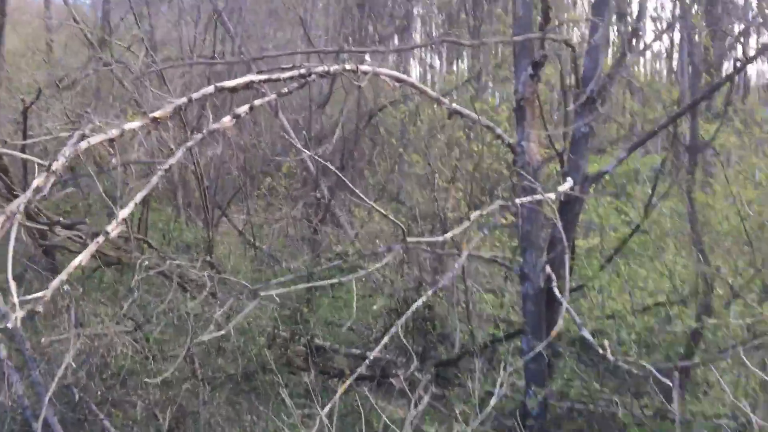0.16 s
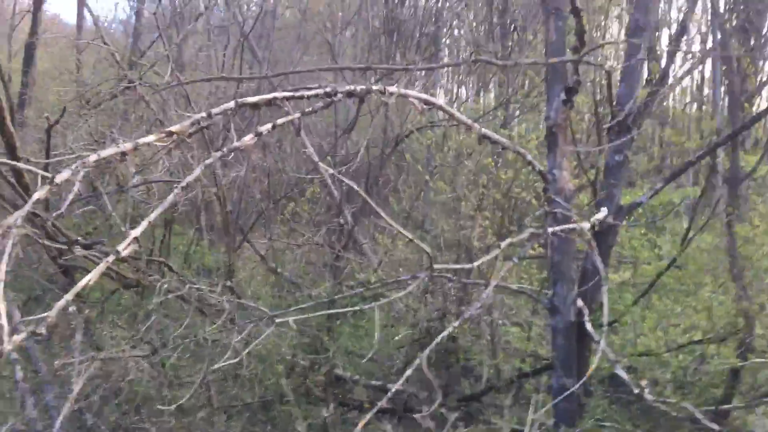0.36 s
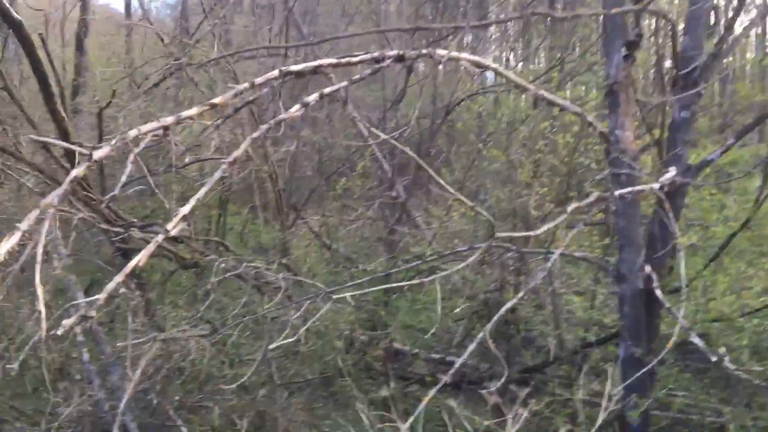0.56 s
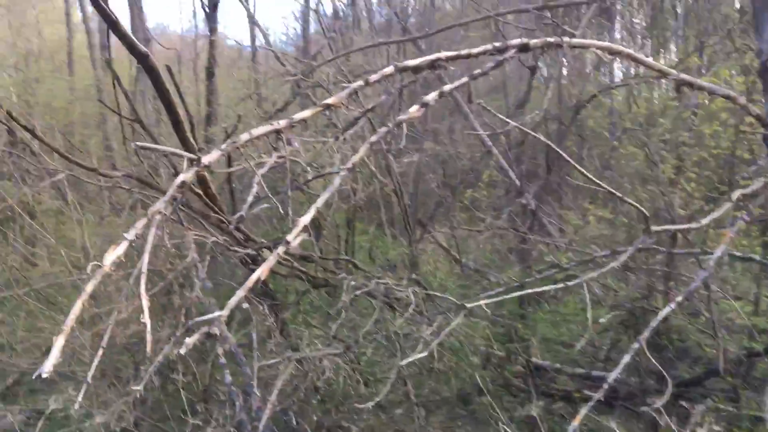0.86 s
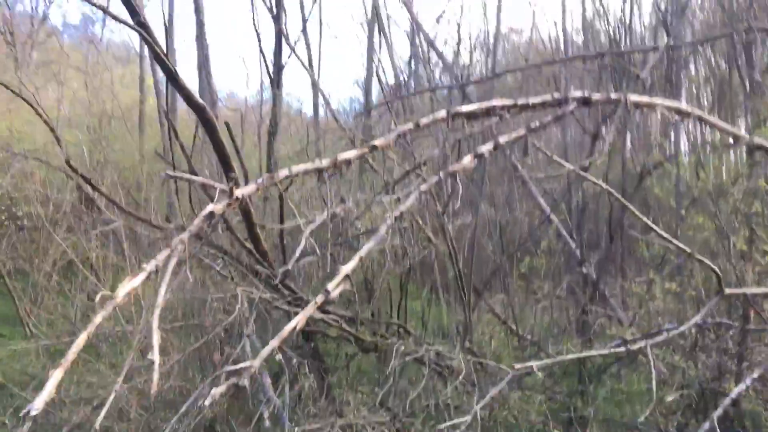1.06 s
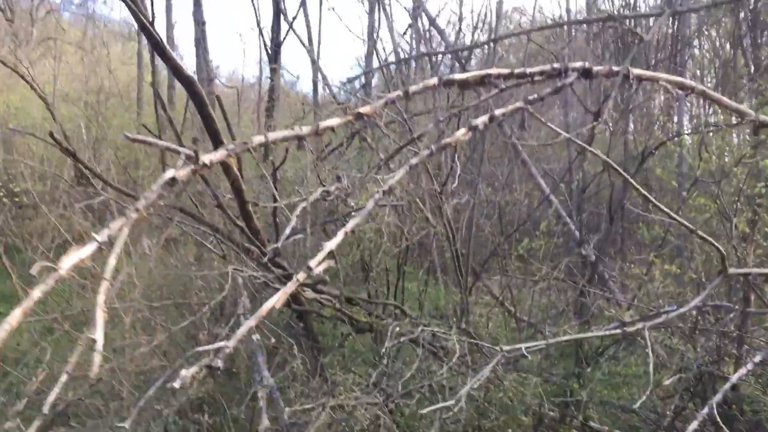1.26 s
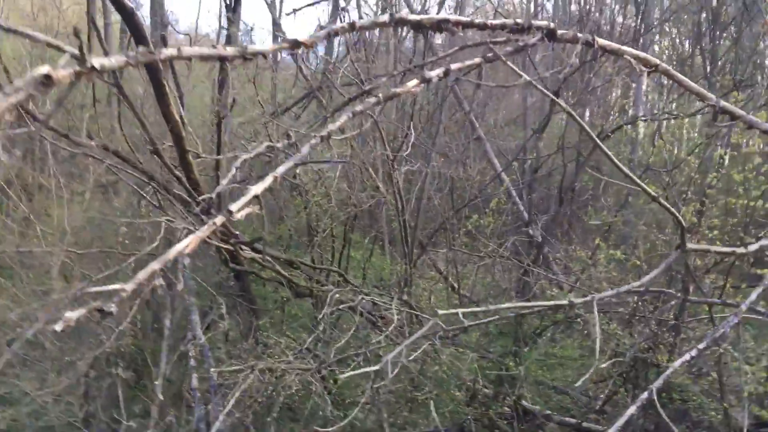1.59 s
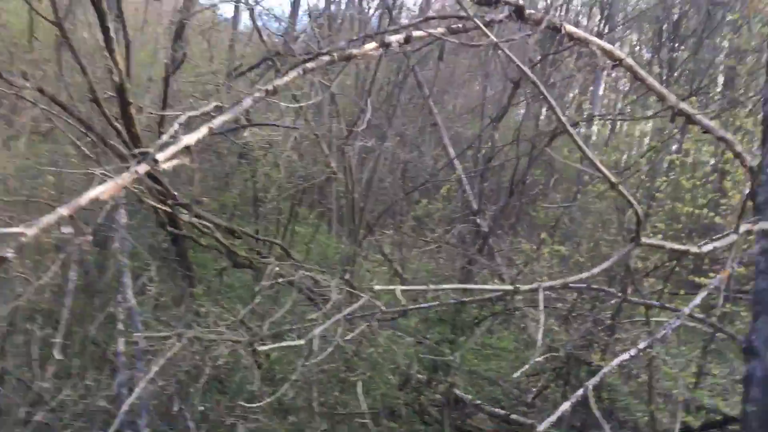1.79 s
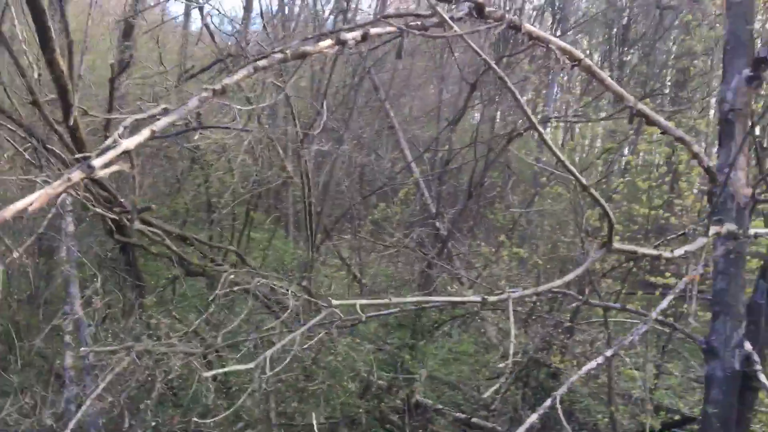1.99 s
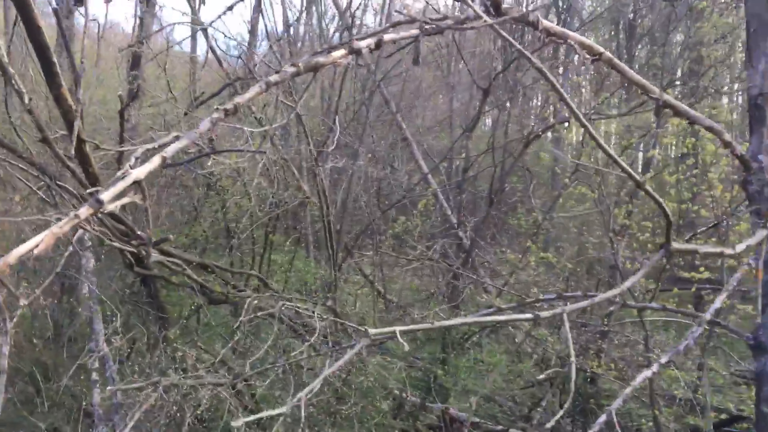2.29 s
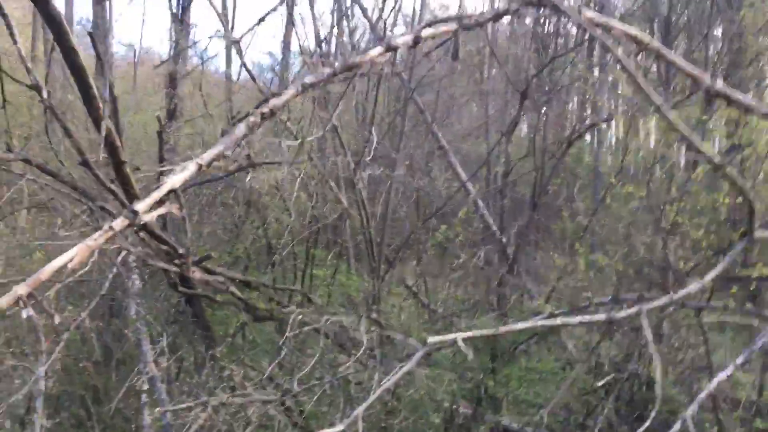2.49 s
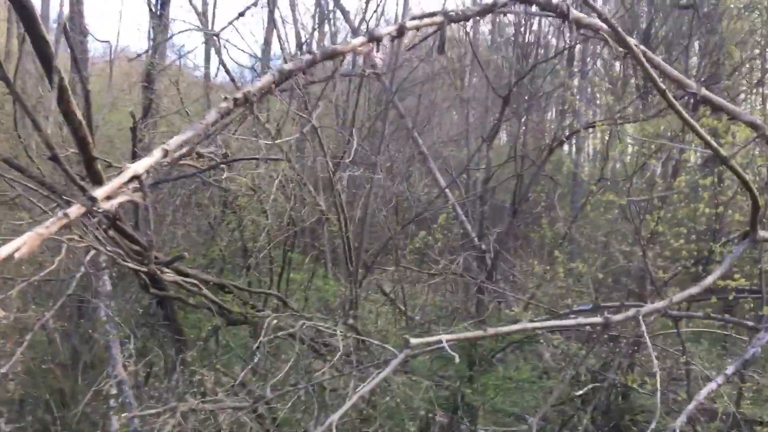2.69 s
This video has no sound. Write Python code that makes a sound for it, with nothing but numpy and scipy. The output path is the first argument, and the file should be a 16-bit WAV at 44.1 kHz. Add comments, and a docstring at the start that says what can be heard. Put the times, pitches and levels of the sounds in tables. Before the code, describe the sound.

Footsteps brush dry leaves and snap twigs close by, with the sharpest cracks midway and a lighter crackle near the end; low wind buffets the bare microphone while a songbird warbles thinly among the trees.

```python
"""Feet brush through dry leaves and snap small twigs close by in a wood: tiny cracks, hiss and short noise bursts.
A songbird warbles among the trees in gliding, wavering whistles, with scattered echoes from the trunks.
Gusty wind on the bare microphone rumbles as shaped noise and thumps it with single pressure swings.
Faint steady air noise lies under it all."""
import sys
import numpy as np
from scipy import signal
from scipy.fft import rfft, irfft
from scipy.io import wavfile
from scipy.ndimage import uniform_filter1d

SR = 44100
rng = np.random.default_rng(int(sys.argv[2]) if len(sys.argv) > 2 else 0)


def transcribe(signal):
    """Save signal, clipped to [-1, 1], as a 16-bit WAV file at the path in sys.argv[1]."""
    frames = np.atleast_2d(signal).T
    limited = np.clip(frames, -1, 1)
    pcm = np.round(limited * 32767).astype(np.int16)
    wavfile.write(sys.argv[1], SR, pcm)


N = 125685
t = np.arange(N) / SR  # [s]

# All spectra: (frequency [Hz], relative density [dB per Hz])
# Faint air of the place
AIR_SPECTRUM = [(290, -31), (500, -3.5), (2340, -12), (2670, -17), (3280, -14.5), (4960, -22.5),
                (9190, -22.5), (10500, -38.5), (12200, -23), (15400, -48), (16800, -45)]
AIR_DB = -68.5

# Bird among the trees: (start [s], length [s], level at note end before waver [dB], rise over the note [dB],
# then pitch at five even steps, before smoothing and wobble [Hz] x 5)
BIRD_NOTES = [(.0, 0.046, -68.5, -5, 4330, 4550, 4370, 4520, 4330),
              (.052, 0.048, -62, -2, 4350, 3910, 3310, 2910, 2850),
              (0.098, 0.03, -56, -1, 3380, 3380, 3360, 3400, 3320),
              (.133, 0.031, -64, 2, 3295, 3360, 3360, 3360, 3320),
              (.145, 0.058, -62, -3.5, 2630, 2710, 2616, 2750, 2800),
              (0.249, 0.16, -68, -1, 2506, 2560, 2664, 2577, 2460),
              (.295, 0.033, -57, 6, 2160, 2193, 2160, 2240, 2230),
              (.385, 0.15, -72.5, -8, 2200, 2233, 2186, 2030, 2085),
              (0.635, 0.049, -61.5, 2, 3800, 3700, 2970, 2990, 2950),
              (.72, 0.041, -58, 1, 3640, 3490, 3400, 2900, 2920),
              (.788, 0.023, -54.5, 2, 4040, 3870, 3600, 3400, 3500),
              (0.805, 0.088, -57.5, 2, 4100, 3790, 3680, 3860, 3970),
              (.934, 0.028, -66, -1.5, 5650, 5520, 5180, 5000, 4740),
              (1.028, 0.044, -47.5, 12, 4330, 3960, 3945, 3837, 3820),
              (1.128, 0.067, -62.5, -4, 4050, 5050, 5170, 5000, 4430),
              (1.184, 0.03, -72, 4, 3330, 3360, 3350, 3370, 3350),
              (1.268, 0.097, -56, -4.5, 3346, 3605, 3070, 3000, 2980),
              (1.367, 0.023, -56, -2, 3040, 2850, 2780, 2640, 2480),
              (1.52, 0.11, -58, -0.5, 4500, 3925, 3637, 3180, 3100),
              (1.668, 0.048, -60, -7.5, 3430, 3333, 3304, 3330, 3240),
              (1.75, 0.038, -62, 3, 4230, 4210, 4100, 4000, 4070),
              (1.916, 0.085, -56, 9, 1886, 2432, 2460, 2442, 2543),
              (2.02, 0.039, -68, 4, 2480, 2410, 2480, 2400, 2360),
              (2.068, 0.041, -58, 7, 2980, 3000, 2996, 2880, 2760),
              (2.201, 0.088, -52, 11.5, 2922, 3026, 3050, 3176, 3140),
              (2.295, 0.07, -69.5, -10.5, 3117, 3150, 3080, 3020, 3150)]
NOTE_EDGE_S = 0.0074
FAR_UNTIL_S, FAR_DIRECT_DB = 0.6, -5  # the first phrase sings from farther off, its direct sound lowered
WAVER_DB, FAR_WAVER_DB, WAVER_S = 3, 7, 0.01  # level waver: depth near and far, time span
WOBBLE, FAR_WOBBLE, WOBBLE_S = 0.003, 0.02, 0.012  # pitch wobble: rms fraction near and far, time span
WOOD_DB, WOOD_DELAY_S, WOOD_T60_S = -4, 0.011, 0.85
NEAR_TRUNKS_DB, NEAR_T60_S = 0, 0.25  # a second, faster decay

# Wind on the microphone, before lumps, brightening and flutter:
# (time [s], rumble level [dB], upper buffeting level [dB])
WIND_LEVELS = [(0.0, -40.5, -46.5), (0.071, -40.5, -65), (0.131, -22.5, -62), (0.212, -39, -53),
               (0.282, -23.5, -59), (0.32, -41.5, -57), (0.379, -25.5, -57), (0.441, -36, -46.5),
               (0.46, -32, -68), (0.55, -45, -61), (0.6, -36.5, -49.5), (0.81, -36, -80),
               (0.83, -27.5, -76), (0.938, -31.5, -54.5), (0.96, -48, -61), (1.019, -30.5, -72),
               (1.151, -33.5, -56.5), (1.191, -24.5, -52.5), (1.26, -31.5, -48), (1.309, -33, -64),
               (1.371, -38.5, -58.5), (1.431, -64, -60), (1.522, -27, -66), (1.592, -41.5, -65),
               (1.61, -24.5, -69), (1.67, -35, -50), (1.72, -24, -37), (1.941, -34, -53.5),
               (2.079, -21.5, -43.5), (2.098, -31, -40.5), (2.27, -37.5, -79), (2.28, -38, -60),
               (2.488, -26.5, -47), (2.56, -35, -66), (2.591, -30, -74), (2.712, -48.5, -64),
               (2.741, -32, -81), (2.85, -60, -57.5)]
# Low rumble, and the buffeting band that the eddies' grit shares
RUMBLE_SPECTRUM = [(12, -57), (24, -18), (54, 8), (107, 4), (268, -16), (353, -28.5), (400, -22),
                   (520, -60.5), (880, -120)]
BUFFET_SPECTRUM = [(88, -38), (150, 4), (533, -12), (669, -19.5), (968, -28.5), (1110, -26.5), (1310, -37),
                   (2000, -62), (2600, -49.5), (4400, -120)]
LUMP_DB, LUMP_S, FLUTTER_DB, FLUTTER_S = 4.5, 0.02, 6, 0.008
# Above the split the rumble gains BRIGHTEN dB more per dB of gust over MID_GUST_DB
SPLIT_HZ, BRIGHTEN, MID_GUST_DB = 140, 0.43, -28.5

# Eddies thumping the microphone: (time [s], peak of the swing's envelope [dB],
# swing length, at least 2 in use [ms], grit relative to the swing's level [dB])
EDDY_THUMPS = [(0.101, -33, 8.1, -17), (0.118, -27.5, 5.8, -0.5), (0.146, -22.5, 5.5, -13),
               (0.282, -30, 2.5, -6.5), (0.363, -17.5, 4.24, -11), (0.417, -33, 7.4, -16),
               (0.494, -29.5, 5.1, -15), (0.584, -38.5, 6.3, -8), (0.612, -28, 4.1, 3),
               (0.801, -33, 4.4, -13), (0.829, -18, 6.7, -25.5), (0.861, -27, 5.8, -7),
               (0.994, -28, 5.6, -13), (1.043, -39, 5.8, -10), (1.102, -30, 5, -8), (1.145, -45.5, 15, 4),
               (1.22, -38, 2.6, -20), (1.505, -26.5, 5.2, -15), (1.553, -36, 4.3, 1),
               (1.619, -17, 5.4, -8.5), (1.689, -18, 8.1, -10), (1.71, -17.5, 5.9, 0.5),
               (1.732, -18, 2, -2.5), (1.761, -18.5, 5.6, -1.5), (1.767, -29, 1.4, 1.5),
               (1.798, -20.5, 6, -6.5), (1.825, -26.5, 4.1, -6), (1.894, -19.5, 5.3, -10.5),
               (1.919, -26.5, 3.4, -12), (1.981, -29, 6.9, -14), (2.025, -33, 2.6, -7),
               (2.067, -14, 4.3, -7), (2.1, -26.5, 2.4, 0.5), (2.285, -18.5, 7.2, -35),
               (2.307, -24.5, 5.2, -6), (2.32, -22, 4.8, -11), (2.337, -21.5, 3.35, 0),
               (2.345, -21, 3.3, -10.5), (2.36, -18, 8.7, -6), (2.368, -13, 1.72, -11.5),
               (2.379, -30, 1.7, -25), (2.401, -17, 5, -0.5), (2.41, -29.5, 9.2, 9), (2.426, -26, 8.6, -12),
               (2.457, -19, 4.8, -18), (2.473, -12.5, 6, -17), (2.508, -28, 5.4, -2),
               (2.576, -38.5, 3.3, 1.5), (2.607, -32, 4.3, -8), (2.616, -23.5, 3.6, -8)]
EDDY_CYCLES, EDDY_SAG = 1.142, 0.39  # starting cycles per swing length, and how the swing slows
GRIT_S = 0.0028
GRIT_HZ, GRIT_BRIGHTEN = 614, 0.48  # top of the grit at mid gust, and dB that it moves per dB of strength

# Leaves under the feet: (time [s], rustle level [dB], dull scrape level [dB])
LEAF_LEVELS = [(.0, -65.5, -62), (.07, -65.5, -66.5), (.1, -73, -69), (.19, -69, -69), (.235, -61, -67),
               (.3, -69, -69), (.38, -75, -69.5), (.55, -75.5, -66), (.57, -73.5, -75), (.6, -76.5, -75),
               (.645, -71.5, -75), (.67, -78, -67.5), (.79, -74.5, -70), (.86, -80, -75), (.93, -73, -60),
               (0.981, -69.5, -72.5), (1.021, -62.5, -54), (1.06, -69.5, -65.5), (1.12, -78, -72.5),
               (1.362, -80, -72), (1.369, -61, -49), (1.401, -61.5, -77), (1.413, -51.5, -70),
               (1.464, -52.5, -54.5), (1.475, -62, -67), (1.52, -59, -62), (1.563, -56, -65.5),
               (1.572, -49, -73), (1.6, -54, -60), (1.64, -51.5, -56), (1.666, -57, -57),
               (1.672, -59.5, -72), (1.7, -67.5, -59), (1.76, -71.5, -76), (1.84, -78, -89),
               (2.23, -77.5, -72), (2.255, -62, -72), (2.29, -84, -75), (2.32, -69, -66),
               (2.42, -57, -56.5), (2.49, -64.5, -77.5), (2.601, -71, -73), (2.66, -86, -72),
               (2.85, -75.5, -70)]
# Crisp leaves, and the duller scrape
LEAF_SPECTRUM = [(410, -49), (700, -24), (810, -33), (1450, -0.5), (3100, 7), (4750, 2.5), (5880, 5.5),
                 (12900, 4.5), (15700, 3.5), (16800, -20)]
SCRAPE_SPECTRUM = [(500, 3), (900, 3), (1500, -0.5), (3000, -10), (6000, -14.5)]
GRAINS_PER_S, GRAIN_SPREAD_DB, GRAIN_S, HISS_SHARE = 1200, 5, 0.0007, 0.45

# Twigs and stiff leaves that snap: (time before a short lag [s], peak level [dB], dullness [0-1])
TWIG_SNAPS = [(0.5927, -50, 1), (0.9357, -53, 0.5), (0.953, -50, 0), (0.96, -41.5, 1), (1.1484, -69, 0.4),
              (1.3665, -30, 0.6), (1.3875, -41, 0.6), (1.4028, -47, 0.6), (1.4072, -27, 0.18),
              (1.4135, -29.5, 0.1), (1.4256, -22, 0.52), (1.4499, -35, 0.63), (1.4586, -36, 0.6),
              (1.4635, -35, 0.3), (1.4774, -40, 0.7), (1.53, -21, 0.2), (1.5595, -25, 0),
              (1.5658, -9, 0.16), (1.6025, -38, 0.2), (1.621, -38, 0.7), (1.6655, -44, 0.2),
              (1.7713, -44, 0.8), (1.9804, -53, 0.5), (2.0012, -49.5, 0.07), (2.167, -58, 0.4),
              (2.2493, -52, 0), (2.311, -42, 0.9), (2.357, -59, 0.6), (2.3824, -48, 0.8),
              (2.3964, -42, 0.04), (2.4006, -36.5, 0.7), (2.4202, -41, 0.17), (2.4748, -41, 0),
              (2.48, -36.5, 0.4), (2.486, -43.5, 0.25), (2.5246, -44, 0.45), (2.5511, -41, 0.55),
              (2.581, -48, 0.1), (2.786, -41, 0.32)]
# Crisp part of the snaps
TWIG_SPECTRUM = [(410, -40), (700, -14), (2380, -31), (2870, -13.5), (5010, 1), (5950, 7), (8090, 7),
                 (8990, 8.5), (12900, 6.5), (16800, -42)]
SNAP_LAG_S, SNAP_S, SNAP_TAIL_S, SNAP_TAIL_DB = 0.0007, 0.0005, 0.004, -19
DULL_LOW_HZ, DULL_HIGH_HZ = 900, 4500

BAND_EDGE_HZ = 16900


def amp(db):
    """Turns decibels into an amplitude factor."""
    return 10 ** (np.asarray(db) / 20)


def evened(x):
    """Scales x to rms 1."""
    return x / np.sqrt(np.mean(x ** 2) + 1e-20)


def add(mix, start_s, sound):
    """Lays sound into mix from start_s on, cut at the end."""
    part = mix[max(round(start_s * SR), 0):][:len(sound)]
    part += sound[:len(part)]


def coloured(x, points, lo_hz, hi_hz):
    """Filters x by the spectrum in points, with rms 1 between lo_hz and hi_hz."""
    hz = np.fft.rfftfreq(N, 1 / SR)
    f, db = np.transpose(points)
    gain = amp(np.interp(np.log(hz + 1), np.log(f + 1), db, left=-90, right=-90))
    z = rfft(x) * gain
    in_band = irfft(z * (hz > lo_hz) * (hz < hi_hz), N)
    return irfft(z, N) / np.std(in_band)


def drift(span_s):
    """Slow chance with rms 1: noise averaged twice over span_s."""
    size = max(int(span_s * SR), 2)
    once = uniform_filter1d(rng.standard_normal(N), size)
    return evened(uniform_filter1d(once, size))


def air():
    """Steady shaped noise, the faint floor of the place."""
    return amp(AIR_DB) * coloured(rng.standard_normal(N), AIR_SPECTRUM, 580, 18000)


def wood(x):
    """Scattered echoes from the trunks: a noise tail with a fast and a slow decay."""
    u = t[:SR]
    decay = amp(-60 * u / WOOD_T60_S) + amp(NEAR_TRUNKS_DB - 60 * u / NEAR_T60_S)
    tail = rng.standard_normal(SR) * decay * (u > WOOD_DELAY_S)
    return amp(WOOD_DB) * signal.fftconvolve(x, tail / np.linalg.norm(tail))[:N]


def bird():
    """Pure gliding whistles that waver in moving air; the first, farther phrase breaks up more."""
    out = np.zeros(N)
    far = t < FAR_UNTIL_S
    wobble = 1 + np.where(far, FAR_WOBBLE, WOBBLE) * drift(WOBBLE_S)
    for start_s, length_s, end_db, rise_db, *pitch_hz in BIRD_NOTES:
        u = np.arange(0, length_s, 1 / SR)
        steps = np.linspace(0, 1, len(pitch_hz))
        hz = np.interp(u / length_s, steps, pitch_hz)
        hz = uniform_filter1d(hz, len(u) // 6, mode="nearest")
        hz = hz * wobble[round(start_s * SR):][:len(u)]
        edge = np.clip(np.minimum(u, length_s - u) / NOTE_EDGE_S, 0, 1)
        fade = np.sin(np.pi / 2 * edge) ** 2
        level = np.sqrt(2) * amp(end_db + rise_db * (u / length_s - 1))  # a sine's peak from its rms
        add(out, start_s, level * fade * np.sin(2 * np.pi * np.cumsum(hz) / SR))
    waver_db = np.where(far, FAR_WAVER_DB, WAVER_DB) * (np.tanh(drift(WAVER_S)) - 0.5)
    return out * amp(waver_db)


def wind():
    """A lumpy rumble that brightens in the gusts, and a fluttering upper band."""
    s, low_db, high_db = np.transpose(WIND_LEVELS)
    gust_db = np.interp(t, s, low_db) + LUMP_DB * np.tanh(drift(LUMP_S))
    low = coloured(rng.standard_normal(N), RUMBLE_SPECTRUM, 30, 270)
    deep = signal.sosfiltfilt(signal.butter(2, SPLIT_HZ, fs=SR, output="sos"), low)
    rumble = deep + (low - deep) * amp(BRIGHTEN * (gust_db - MID_GUST_DB))
    flutter = evened(amp(FLUTTER_DB * np.tanh(drift(FLUTTER_S))))
    buffet = coloured(rng.standard_normal(N), BUFFET_SPECTRUM, 184, 900) * flutter
    return rumble * amp(gust_db) + buffet * amp(np.interp(t, s, high_db))


def eddies():
    """Sudden pressure swings that slow as they die, each with a burst of grit, brighter when strong."""
    out = np.zeros(N)
    signs = rng.choice([-1., 1.], len(EDDY_THUMPS))
    noise = coloured(rng.standard_normal(N), BUFFET_SPECTRUM, 126.4, 900)
    for (s, db, ms, grit_db), sign in zip(EDDY_THUMPS, signs):
        u = t[:2500] * 1000 / np.maximum(ms, 2)
        envelope = (2 * u) ** 2 * np.exp(2 - 4 * u)
        swing = envelope * np.sin(2 * np.pi * EDDY_CYCLES * u / (1 + EDDY_SAG * u))
        puff = np.exp(-(t[:2500] / GRIT_S - 1.5) ** 2)
        top_hz = GRIT_HZ * amp(GRIT_BRIGHTEN * (db + grit_db - MID_GUST_DB))
        low_pass = signal.butter(2, top_hz, fs=SR, output="sos")
        # 500 samples of run-up let the filter settle
        burst = puff * signal.sosfilt(low_pass, noise[round(s * SR) - 500:][:3000])[500:]
        grit = burst * np.linalg.norm(puff) / np.linalg.norm(burst)
        add(out, s, amp(db) * (sign * swing + amp(grit_db) * grit))
    return out


def rustle():
    """Dense tiny cracks of uneven size over the hiss of leaves sliding; a duller scrape shares them."""
    s, leaf_db, scrape_db = np.transpose(LEAF_LEVELS)
    size = amp(GRAIN_SPREAD_DB * np.minimum(rng.exponential(1, N), 4))
    grains = size * (rng.random(N) < GRAINS_PER_S / SR)
    shape = signal.lfilter([1], [1, -np.exp(-1 / (GRAIN_S * SR))], grains)
    drive = rng.standard_normal(N) * (HISS_SHARE + (1 - HISS_SHARE) * evened(shape))
    leaves = coloured(drive, LEAF_SPECTRUM, 4350, 17650)
    scrape = coloured(drive + rng.standard_normal(N), SCRAPE_SPECTRUM, 600, 3900)
    return leaves * amp(np.interp(t, s, leaf_db)) + scrape * amp(np.interp(t, s, scrape_db))


def snaps():
    """Each snap is a sharp crack with a short scatter after it; dull ones have more body."""
    out, u = np.zeros(N), t[:1500]
    attack = np.minimum(u * SR / 4, 1)  # four samples
    shape = attack * (np.exp(-u / SNAP_S) + amp(SNAP_TAIL_DB) * np.exp(-u / SNAP_TAIL_S))
    crisp = coloured(rng.standard_normal(N), TWIG_SPECTRUM, 3000, 16000)
    body_band = signal.butter(2, [DULL_LOW_HZ, DULL_HIGH_HZ], "bandpass", fs=SR)
    body = evened(signal.lfilter(*body_band, rng.standard_normal(N)))
    for k, (s, db, dull) in enumerate(TWIG_SNAPS):
        part = slice(1500 * k, 1500 * k + 1500)  # fresh noise for each snap
        crack = shape * ((1 - dull) * crisp[part] + dull * body[part])
        add(out, s + SNAP_LAG_S, amp(db) * crack / np.abs(crack).max())
    return out


def scene():
    """The wood from its faint air, through bird and wind, to the feet close by, on one channel."""
    song = bird()
    direct_song = song * amp(FAR_DIRECT_DB * (t < FAR_UNTIL_S))
    background = air() + wood(song) + direct_song
    microphone_wind = wind() + eddies()
    feet = rustle() + snaps()
    return (background + microphone_wind + feet)[None]


def record(dry):
    """The band limit: a steep low-pass takes off the top treble."""
    low_pass = signal.firwin(511, BAND_EDGE_HZ, window=("kaiser", 9), fs=SR)
    return signal.oaconvolve(dry, low_pass[None], "same")


dry = scene()
out = record(dry)
transcribe(out)
```